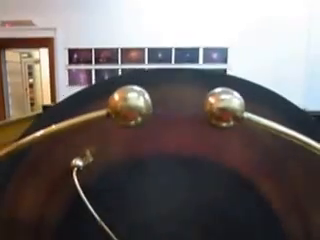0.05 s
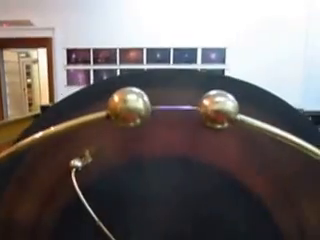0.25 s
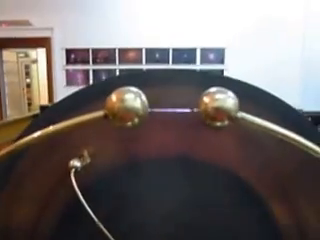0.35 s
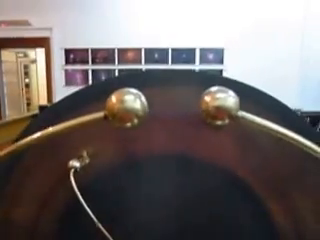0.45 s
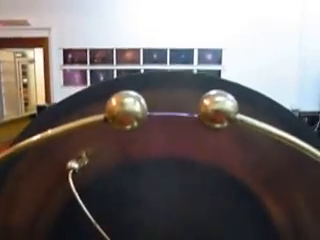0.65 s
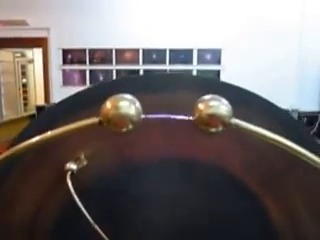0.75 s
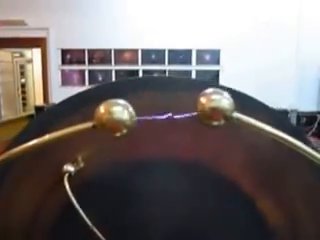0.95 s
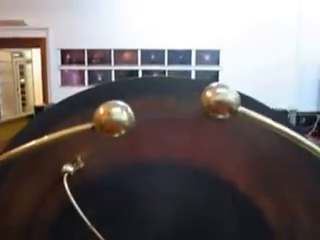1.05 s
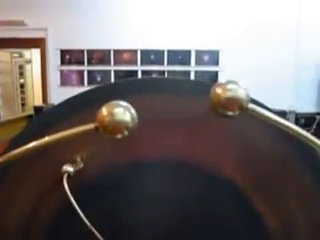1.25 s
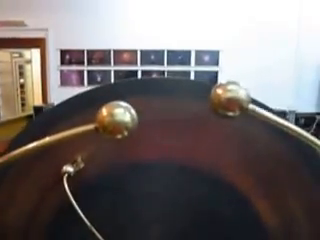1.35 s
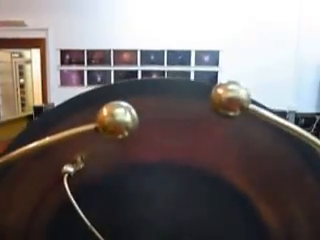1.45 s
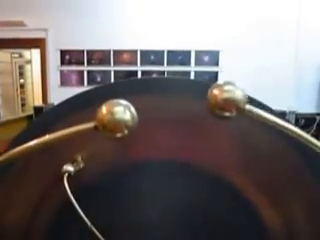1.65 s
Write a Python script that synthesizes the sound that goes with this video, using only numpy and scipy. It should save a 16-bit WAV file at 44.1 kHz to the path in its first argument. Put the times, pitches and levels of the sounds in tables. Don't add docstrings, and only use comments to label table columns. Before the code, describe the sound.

A fast, fairly regular train of sharp electric snaps, very close and clipping on the brightest arcs, thins to lighter ticks as the spheres part, while a hand-cranked machine quietly clinks each turn in a dry room.

```python
import sys
import numpy as np
from scipy import signal
from scipy.fft import rfft, irfft, next_fast_len
from scipy.io import wavfile
from scipy.ndimage import uniform_filter1d, map_coordinates

SR = 44100
rng = np.random.default_rng(int(sys.argv[2]) if len(sys.argv) > 2 else 0)


def unload_audio(sound):
    columns = np.transpose(np.atleast_2d(sound))
    steps = np.round(np.clip(columns, -1, 1) * 32767)
    wavfile.write(sys.argv[1], SR, steps.astype(np.int16))


def nominal_scale(level):
    x = np.asarray(level, float) / 20
    return 10 ** x


N = 74970

# t/s, level/dB
TURNS = [
    (.0084, -38),
    (0.2855, -42),
    (0.5549, -38.5),
    (0.8249, -38.5),
    (1.0904, -38.5),
    (1.3562, -36),
    (1.6211, -34.5),
]
# t/s, spike level/dB, kick level/dB
ARCS = [(.2159, -0.5, -10.5), (0.2573, 0, 7), (.286, -27, -22), (0.3923, -11, 2.5), (0.4159, -57, -26),
        (0.538, -4, -10), (0.574, -15, 7), (0.6045, -42, -22), (0.6155, -13.5, -10), (0.7648, -4, -10.5),
        (.81054, -3.5, -10.5), (0.9106, -20, 6.5), (0.9408, -55, -22.6)]


def unit(x):
    return x / np.sqrt(np.mean(x ** 2) + 1e-20)


def filtered(x, response):
    m = next_fast_len(N + 8192)
    return irfft(rfft(x, m) * response(1j * np.fft.rfftfreq(m, 1 / SR)), m)[:N]


def along(points, hz):
    f, db = np.transpose(points)
    return nominal_scale(np.interp(np.log(hz + 1), np.log(f + 1), db))


def impulses(s, db):
    at = np.asarray(s)[:, None] * SR
    k = np.floor(at) + np.arange(-15, 17)
    shape = np.sinc(k - at) * np.cos(np.pi * (k - at) / 32) ** 2
    weights = shape * nominal_scale(db)[:, None]
    return -np.bincount(k.astype(int).ravel(), weights.ravel(), N)[:N]


def wobble(rate):
    knots = rng.standard_normal(int(N * rate / SR) + 4)
    return map_coordinates(knots, [np.arange(N) * rate / SR])


def rush(colour, patchy_db):
    z = signal.stft(rng.standard_normal(N + 512), nperseg=256)[2]
    field = uniform_filter1d(rng.standard_normal(z.shape), size=3, axis=0)
    field = unit(uniform_filter1d(field, size=4, axis=1))
    noise = signal.istft(z * nominal_scale(patchy_db * field), nperseg=256)[1][:N]
    return unit(filtered(noise, lambda j: colour(j.imag)))


def strike(out, s, modes, db, spread_db, detune, attack_s, rough):
    t = np.arange(SR // 5) / SR
    start = round(s * SR)
    for hz, level, t60 in modes:
        louder, sharper, phase = rng.standard_normal(3)
        phase_knots, level_knots = rng.standard_normal((2, 84))
        phase_drift = rough * np.interp(400 * t, np.arange(84), phase_knots)
        swell = rough * np.interp(400 * t, np.arange(84), level_knots)
        ring = np.sin(2 * np.pi * hz * (1 + detune * sharper) * t + 2 * phase + phase_drift)
        ring *= 1 - np.exp(-t / attack_s)
        ring_db = db + level + spread_db * louder + 4 * swell - 60 * t / t60
        out[start:start + len(t)] += nominal_scale(ring_db) * ring


def turn_edges():
    start = np.array(TURNS)[:, 0]
    return np.append(start, 2 * start[-1] - start[-2])


def wooden_frame():
    # f/Hz, level/dB per Hz
    rumble = [(18, -34), (30, -7), (136, 0), (174, -1), (247, -0.5), (473, -2), (1120, -6), (2000, -20.5),
              (2600, -37), (4400, -120)]
    # f/Hz, width/Hz, level/dB
    resonances = [(728, 14, 11), (1150, 60, 5)]
    # t/s, level/dB
    shake = [
        (0.0, -65),
        (0.132, -63.5),
        (0.43, -69),
        (0.558, -66),
        (0.8, -66.5),
        (0.98, -68.5),
        (1.258, -62.5),
        (1.7, -60),
    ]

    def colour(hz):
        peaks = sum(nominal_scale(db) / (1 + (2 * (hz - c) / width) ** 2) for c, width, db in resonances)
        return along(rumble, hz) * (1 + peaks)

    shake_db = np.interp(np.arange(N) / SR, *np.transpose(shake))
    return nominal_scale(shake_db - 0.5 + 0.7 * wobble(25)) * rush(colour, patchy_db=2.5)


def brushes():
    # f/Hz, level/dB per Hz
    hiss = [(710, -35), (1200, -12.5), (1670, -11), (3420, -2), (6110, -4), (7100, -8.5), (8000, -7),
            (10400, -48), (17600, -120)]
    # share of the turn [0-1], level/dB
    rub = [(0, 1.5), (.2, 0.5), (.3, -0.5), (.4, 1.5), (.55, -0.5), (.7, -3), (.9, 3.5)]
    edges = turn_edges()
    share = np.interp(np.arange(N) / SR, edges, np.arange(len(edges))) % 1
    rub_db = np.interp(share, *np.transpose(rub), period=1)
    return nominal_scale(-60 + rub_db + 1.6 * wobble(60)) * rush(lambda hz: along(hiss, hz), patchy_db=2.5)


def drive():
    # f/Hz, level/dB, t60/s
    clink = [(3305, -11, .035), (3525, -7, .05), (3610, -11, .04), (3830, 0, .05), (3955, -9, .045),
             (4048, -1, .055), (4360, -11, .035), (4690, -6, .028), (5040, -10, .025), (5580, -11, .035)]
    # share of the turn [0-1], f/Hz, level/dB, t60/s
    rattles = [(.3, 2950, -57.5, .03), (0.347, 3404, -43, 0.023), (.345, 5600, -46, .02),
               (.35, 6500, -49.5, .02), (.35, 745, -49, 0.023), (.38, 3380, -43.5, 0.018),
               (0.386, 1150, -56, 0.09), (0.409, 6000, -37, 0.015), (0.414, 4680, -49, 0.027),
               (.5, 3670, -49, 0.022), (.785, 2940, -50.5, 0.037), (.785, 5460, -45.5, 0.023),
               (0.844, 5450, -54.5, 0.04), (.86, 3350, -45.5, 0.022), (.875, 4870, -49.5, 0.049),
               (0.899, 1144, -55.5, 0.048), (0.901, 731, -56, 0.056), (0.909, 6500, -57.5, 0.015),
               (.935, 4780, -58, .025)]
    # f/Hz, level/dB, t60/s
    handle = [(242, -6.5, 0.21), (591, 3, .14), (754, 1.5, 0.041), (1130, -1, .08), (1330, -7, .04)]
    out = np.zeros(N + SR)
    for (start, db), length in zip(TURNS, np.diff(turn_edges())):
        strike(out, start, clink, db, spread_db=1.4, detune=1 / 1500, attack_s=.0004, rough=.13)
        for share, hz, level_db, t60 in rattles:
            modes = [(hz, 0, t60), (1.2 * hz, -5, t60)]
            strike(out, start + share * length, modes, level_db,
                   spread_db=2.0, detune=0.013, attack_s=0.0011, rough=.3)
    strike(out, 1.2115, handle, -47.5, spread_db=0.5, detune=0, attack_s=0.00037, rough=.13)
    return out[:N]


def snaps():
    # t/s, spike level/dB, crack level/dB
    close = [(0.0164, -14, -14), (0.06854, -2.5, -42), (0.1144, -11.5, -13), (0.1401, -3, -39),
             (0.1843, -8.5, -37), (0.29713, -14, -18.5), (0.3369, -10, -35), (0.36967, -8, -33.8),
             (0.43237, -9.5, -36.4), (0.47404, -13, -16.5), (0.5124, -9.5, -43), (0.6565, -8, -38),
             (0.69387, -7, -47), (0.7323, -14, -18.5), (0.8537, -13.5, -12), (0.88277, -9.5, -13),
             (0.9501, -19, -19.5), (0.9817, -13.5, -17)]
    # t/s, spike level/dB, crack level/dB
    apart = [(1.0169, -12.5, -50), (1.06364, -16, -13), (1.0974, -35, -20), (1.1341, -45, -16.5),
             (1.1741, -17.5, -11), (1.20742, -21.5, -10.5), (1.2437, -11, -11.5), (1.2834, -38, -15.5),
             (1.32342, -22.5, -16), (1.36052, -27.5, -15), (1.40599, -50, -16), (1.4786, -42.5, -16),
             (1.5154, -48, -25), (1.5399, -28, -23.5), (1.5897, -25, -19), (1.61723, -57, -27),
             (1.6743, -53, -13.5)][1:]
    # t/s, spike level/dB, crack level/dB
    twin = [
        (1.01698, -17.5, -45),
        (1.01712, -17.5, -45),
    ]
    arc, snap = np.array(ARCS), np.vstack([close, apart, twin])
    spike = impulses(arc[:, 0], arc[:, 1]) + impulses(snap[:, 0], snap[:, 1])
    crack = filtered(impulses(snap[:, 0], snap[:, 2]), lambda j: j / 4000)

    def reflected(j):
        echo = .16 * np.exp(-2 * np.pi * j * .000828)
        late = -.09 * np.exp(-2 * np.pi * j * .00124)
        return (1 + echo + late) * j / (j + 160)

    t = np.arange(SR // 20) / SR
    tail = rng.standard_normal(len(t)) * nominal_scale(-60 * t / .02) * (t > .0004)
    tail = nominal_scale(-19) * tail / np.linalg.norm(tail)
    answer = signal.fftconvolve(spike + crack, tail)[:N]
    return filtered(spike + crack, reflected) + filtered(answer, lambda j: (j / (j + 3000)) ** 2)


def kicks():
    arc = np.array(ARCS)
    bright = arc[:, 2] > 5
    coupling_hz = 103

    def kick(rows, fall_hz, extra_db):
        push = impulses(rows[:, 0], rows[:, 2] + extra_db)
        return filtered(push, lambda j: 3000 * j / (j + fall_hz) / (j + coupling_hz))

    return kick(arc[~bright], 188, 0) + kick(arc[bright], 247, 1.6)


def sparks():
    # f/Hz, Q
    front = [(6740, 1.95), (3520, 0.63)]

    def response(j):
        return np.prod([1 / (1 + j / (hz * q) + (j / hz) ** 2) for hz, q in front], axis=0)

    return filtered(snaps() + kicks(), response)


def scene():
    return (wooden_frame() + brushes() + drive() + sparks())[None]


def band_limit(x):
    return signal.sosfilt(signal.butter(12, 16200, fs=SR, output="sos"), x)


def record(dry):
    overload, knee = 0.67, 26
    top_hz, steepness = 7304, 25.3
    full_scale = .702
    x = dry[0] / (1 + np.abs(dry[0] / overload) ** knee) ** (1 / knee)
    x = filtered(x, lambda j: 1 / (1 + (j.imag / top_hz) ** steepness))
    return band_limit(np.clip(x, -full_scale, full_scale)[None])


dry = scene()
out = record(dry)
unload_audio(out)
```